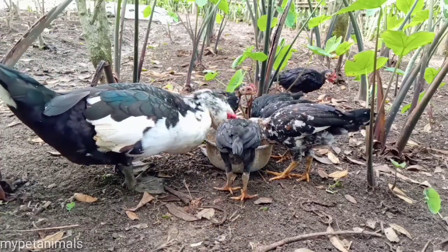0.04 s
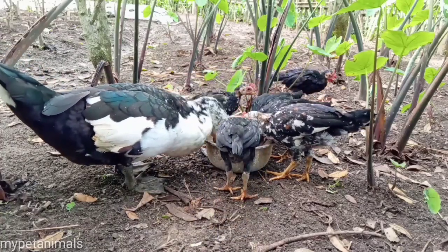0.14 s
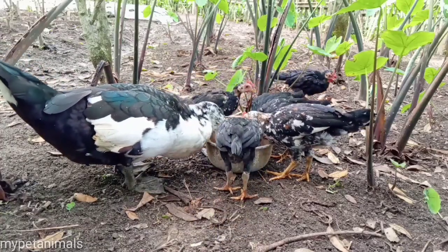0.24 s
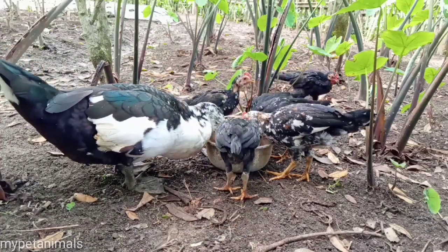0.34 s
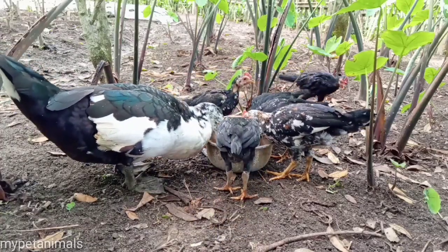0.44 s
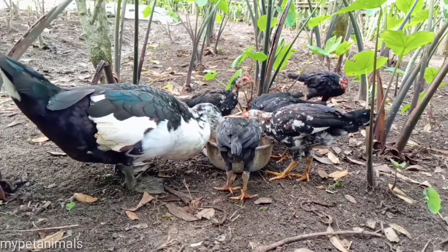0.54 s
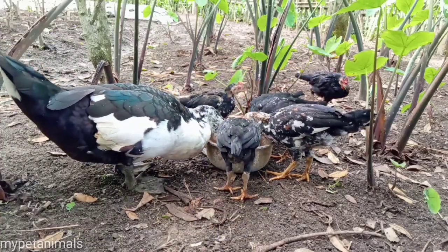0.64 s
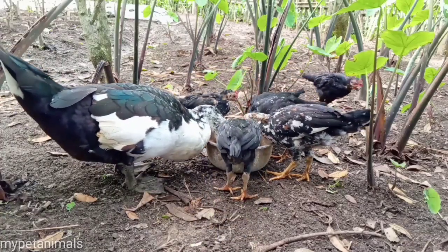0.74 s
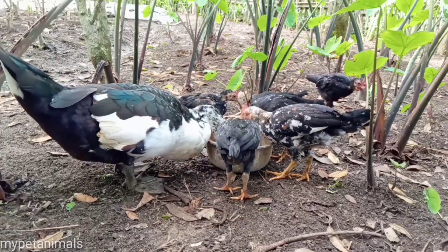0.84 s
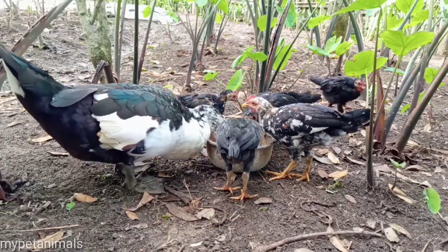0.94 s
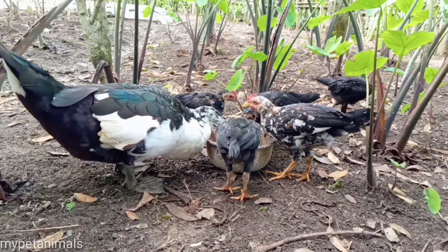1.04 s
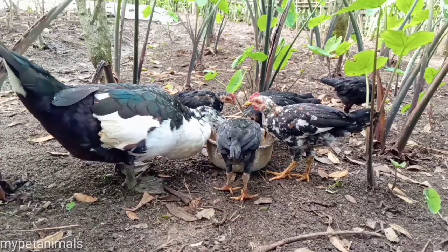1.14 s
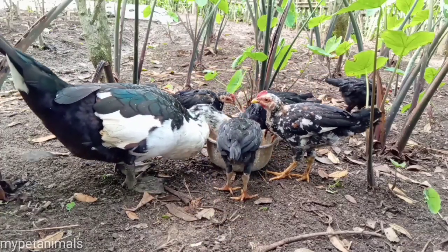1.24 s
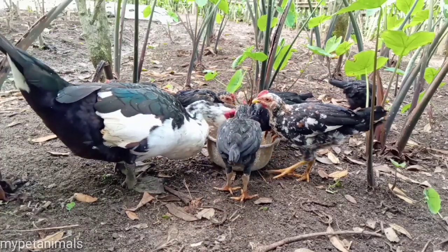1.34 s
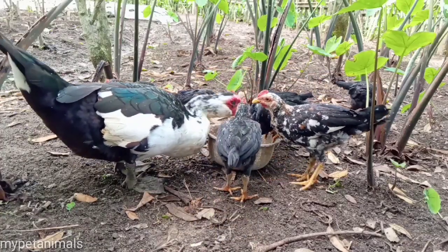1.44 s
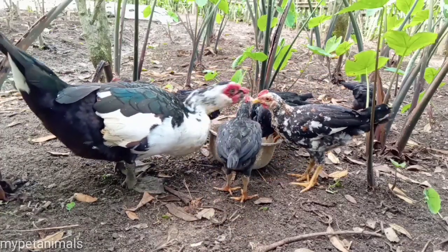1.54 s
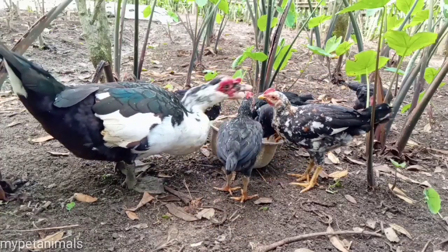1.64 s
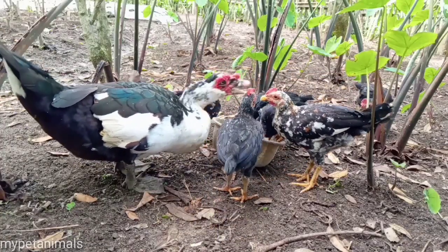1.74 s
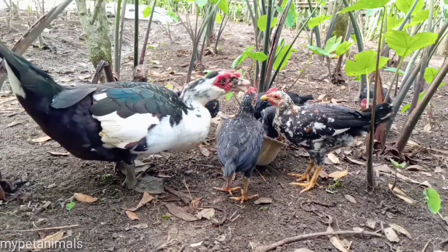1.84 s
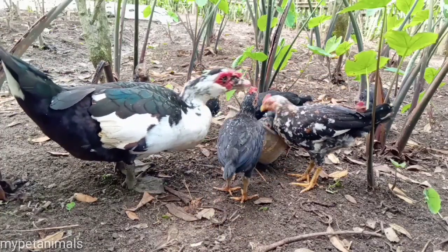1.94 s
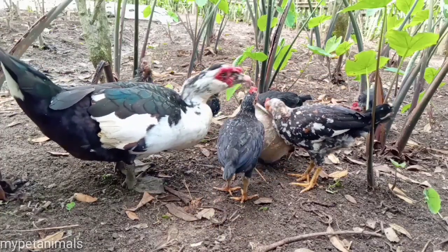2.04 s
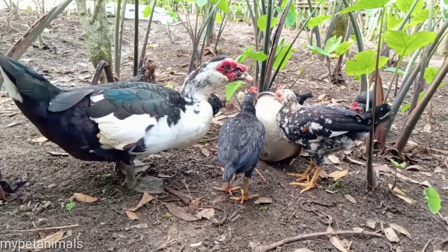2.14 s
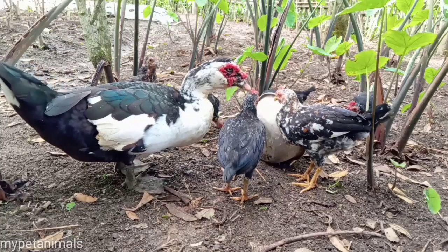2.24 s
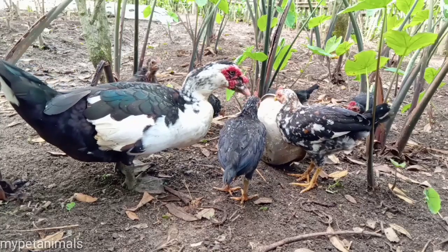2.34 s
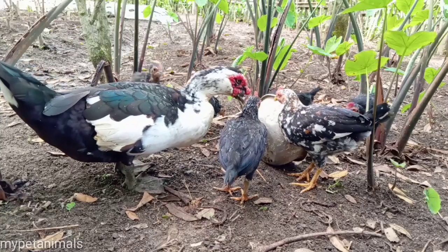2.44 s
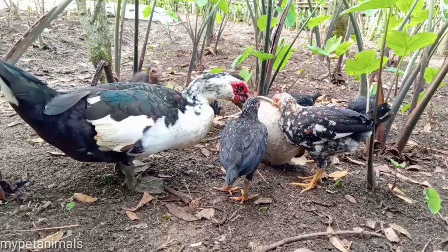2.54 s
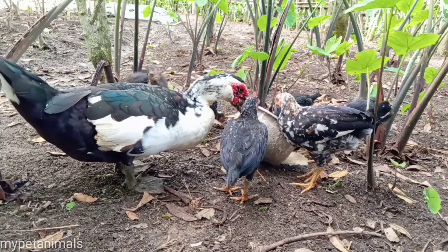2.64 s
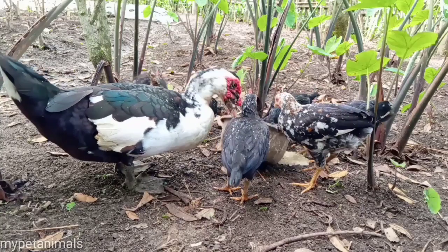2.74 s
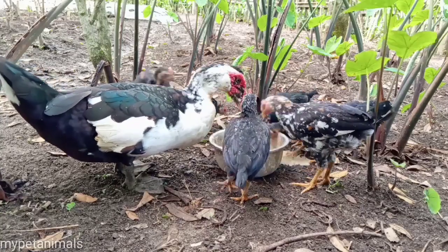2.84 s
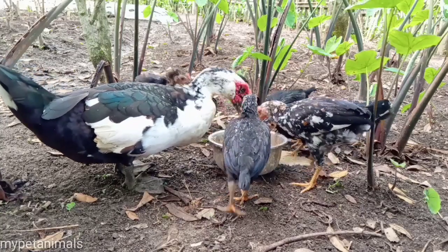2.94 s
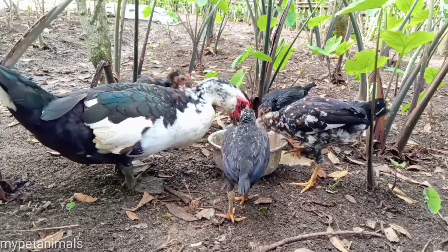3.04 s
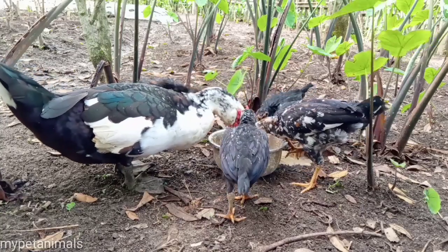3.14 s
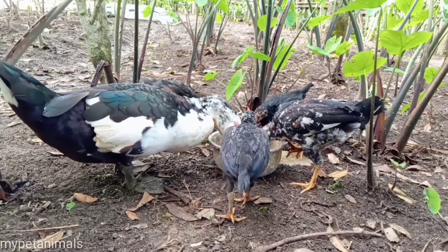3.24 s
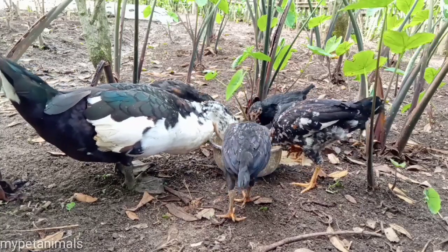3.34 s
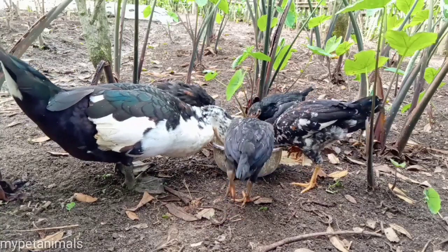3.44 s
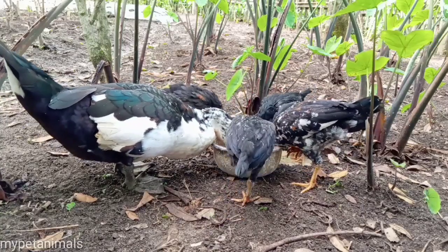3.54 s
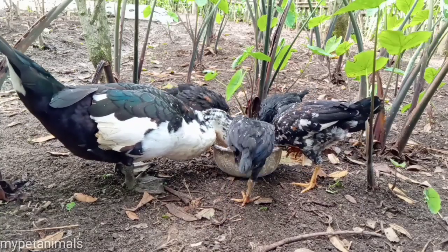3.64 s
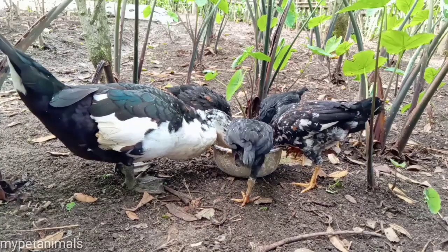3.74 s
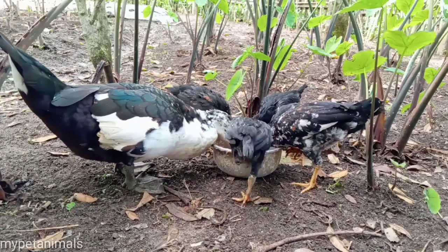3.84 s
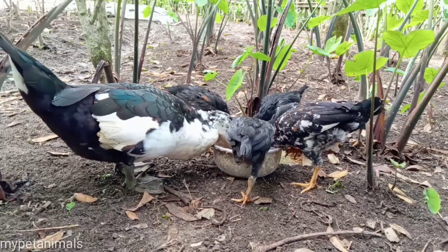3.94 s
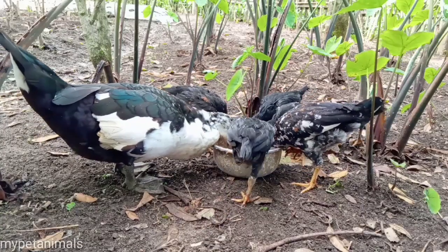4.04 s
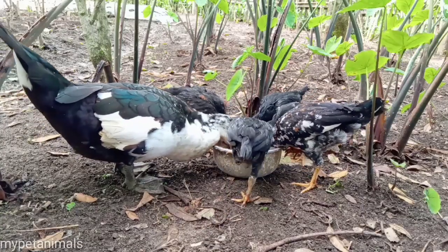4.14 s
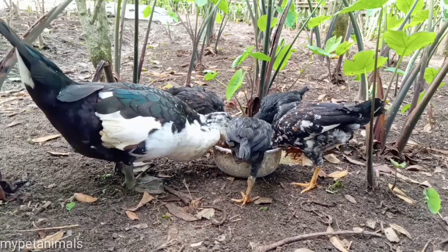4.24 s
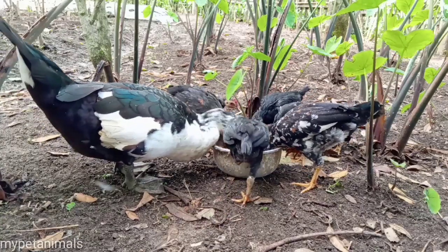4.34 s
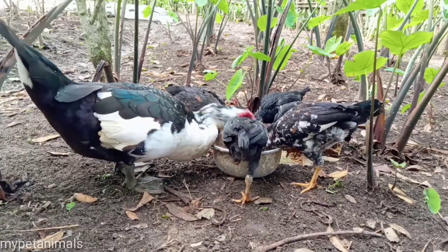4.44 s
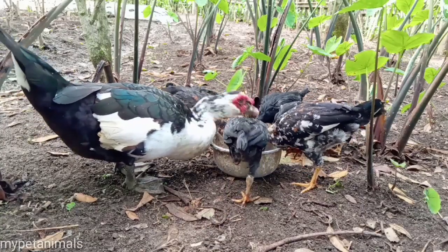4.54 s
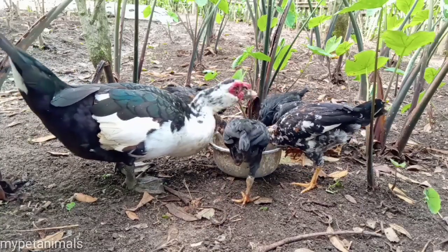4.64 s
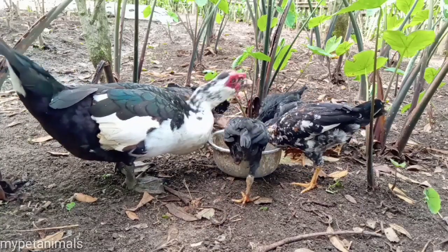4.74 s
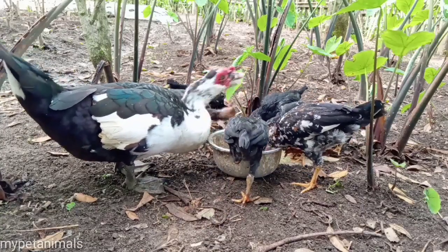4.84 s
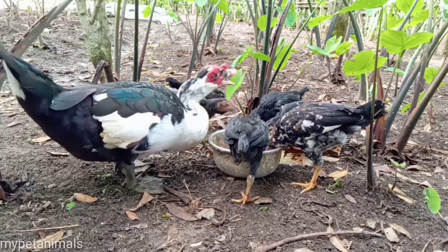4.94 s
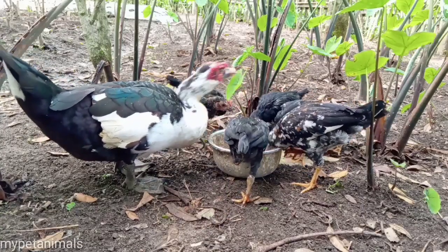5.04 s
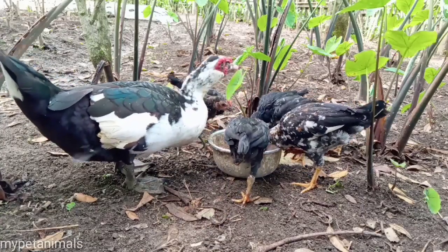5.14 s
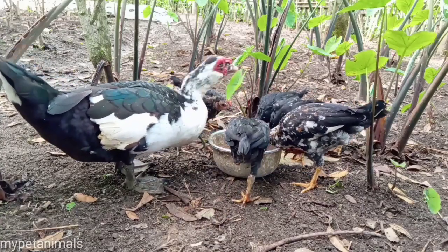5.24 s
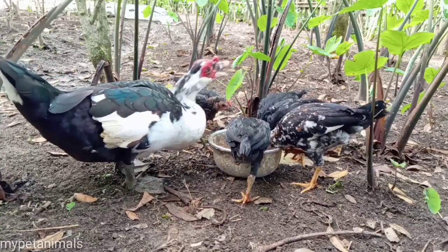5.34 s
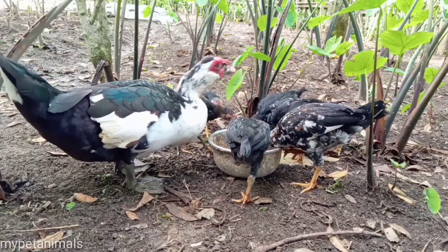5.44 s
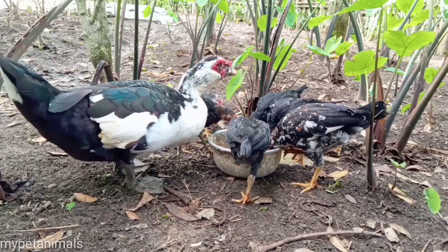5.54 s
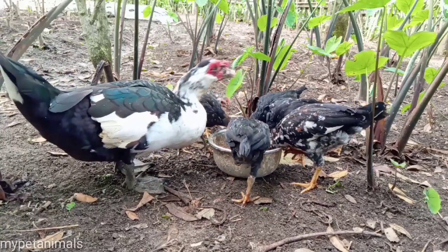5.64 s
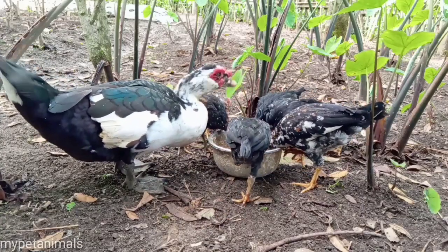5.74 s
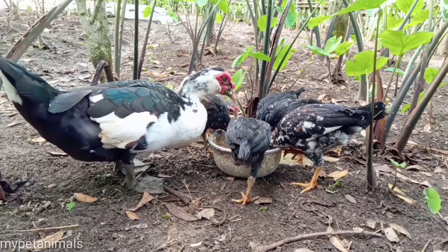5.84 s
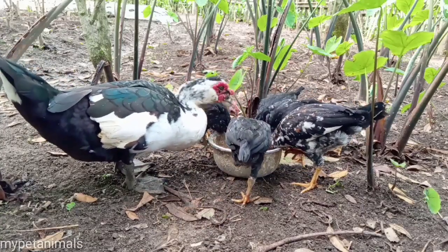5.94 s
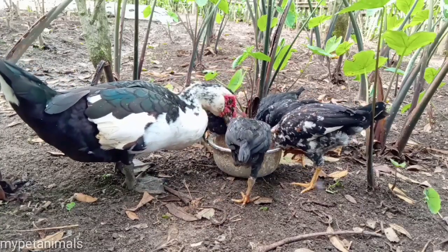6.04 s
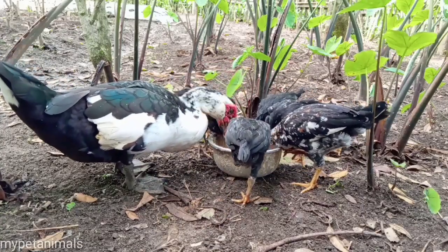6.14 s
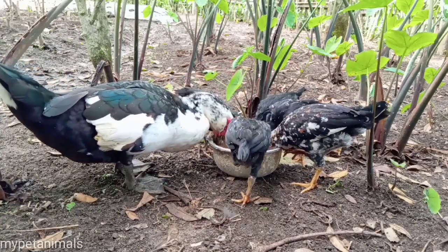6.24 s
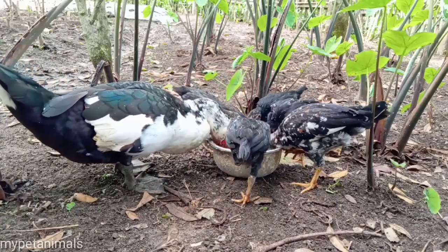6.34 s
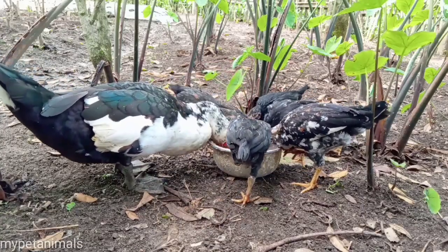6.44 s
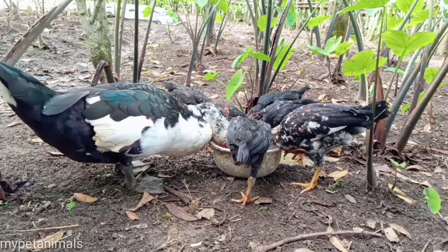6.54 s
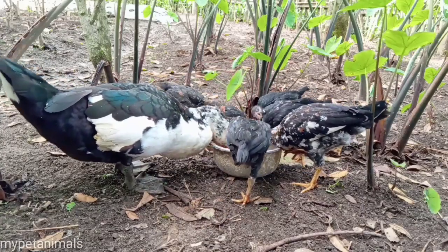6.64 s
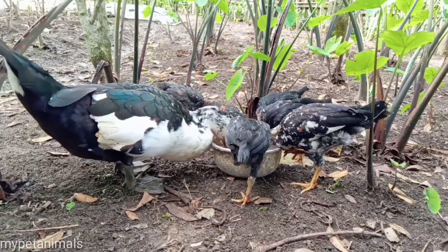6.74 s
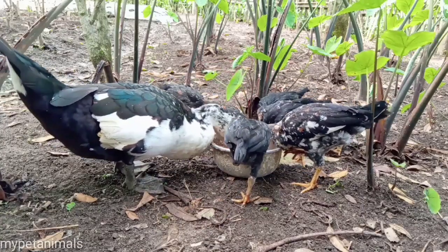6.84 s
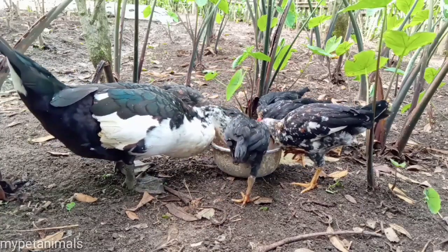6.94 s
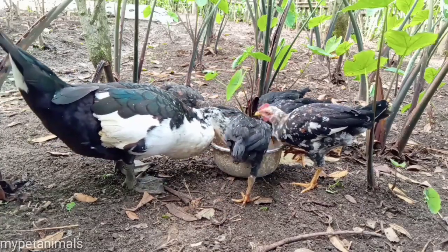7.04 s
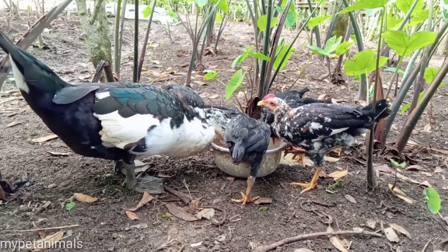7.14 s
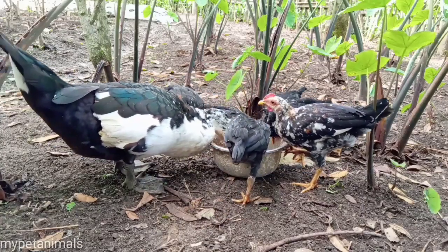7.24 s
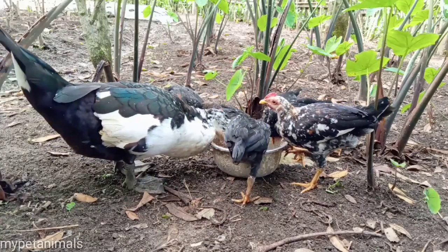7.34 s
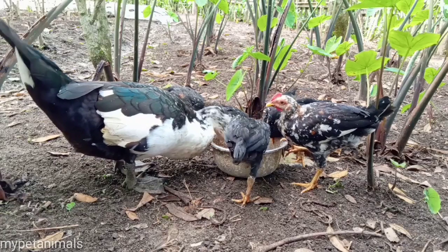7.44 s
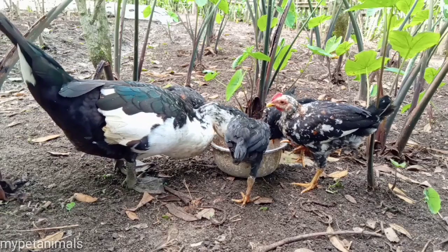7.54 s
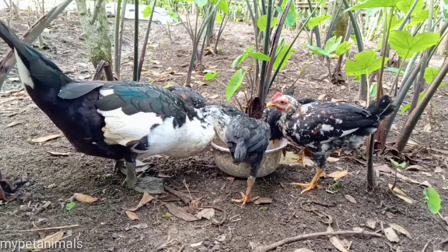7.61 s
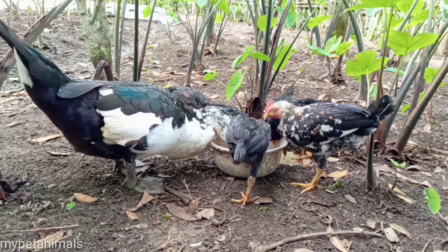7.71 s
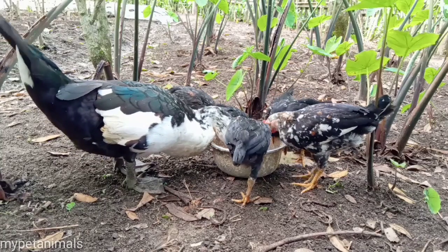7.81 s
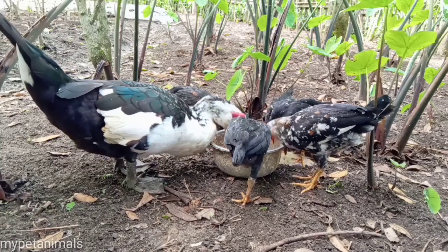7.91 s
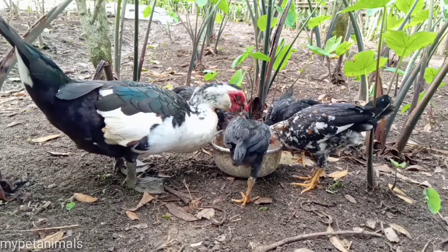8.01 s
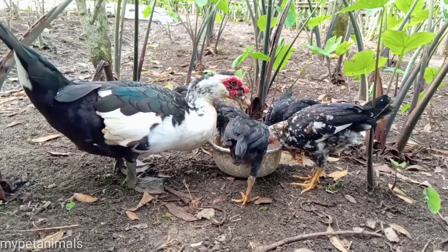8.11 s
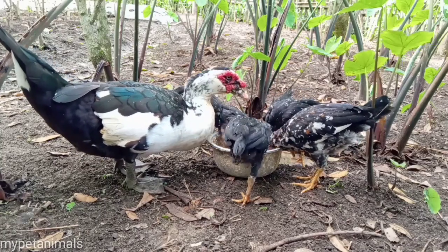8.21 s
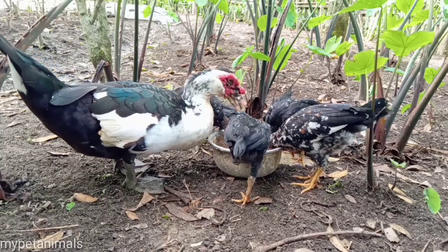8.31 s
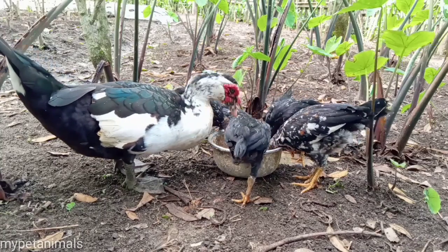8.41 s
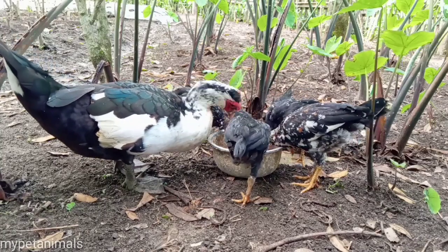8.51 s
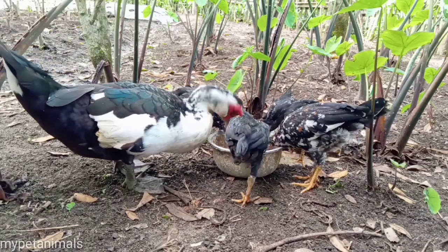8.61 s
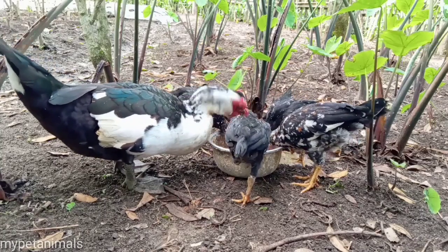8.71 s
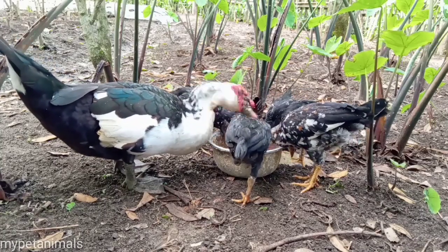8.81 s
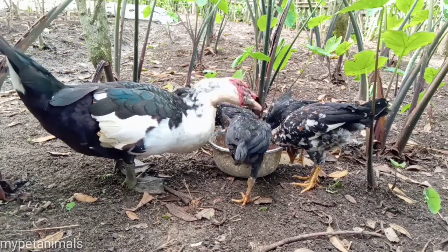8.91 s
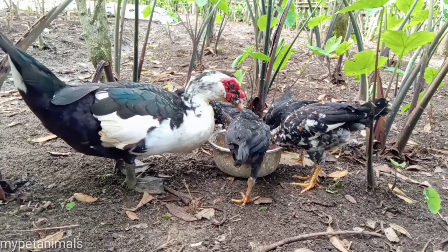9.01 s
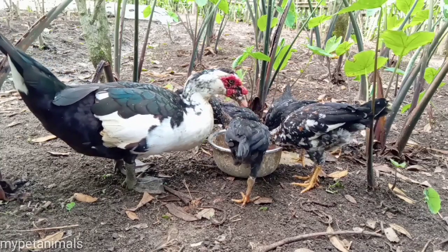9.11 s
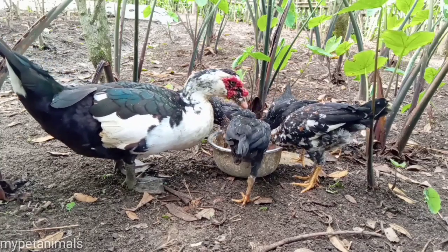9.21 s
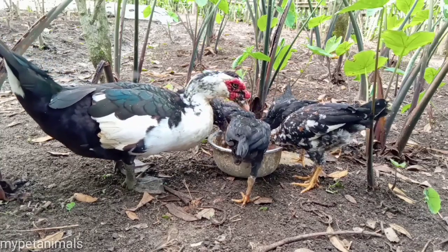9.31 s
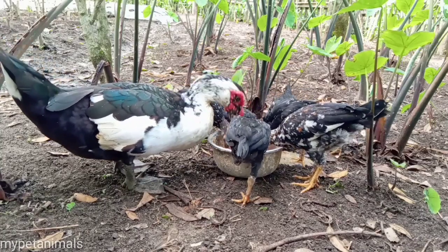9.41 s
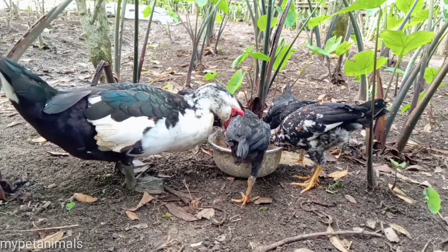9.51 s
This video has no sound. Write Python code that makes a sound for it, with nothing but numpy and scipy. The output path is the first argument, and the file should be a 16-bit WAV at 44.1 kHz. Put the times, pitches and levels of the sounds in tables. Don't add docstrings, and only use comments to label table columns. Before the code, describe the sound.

A quiet open-air yard: soft hiss, thin insect buzz, tiny grain clicks and an unsteady, deep distant engine hum. At 0.1 s a near chick gives a falling chirp with a low murmur, and at 0.2 s a beak cracks brightly on metal. Distant peeps and light ticks follow, with a steep falling whistle at 0.9 s and a held note at 1.9 s. From 2.7 to 3.2 s comes the busiest, loudest burst: a dull bowl knock, overlapping piercing peeps, then a hard ringing rim strike at 3.0 s and paired falling calls. It calms abruptly; faint pecks, leaf brushes and a longer call near 4.1 s, then distant diving peeps around 5 and 6 s. Small clucks and peeps return at 7.3-7.6 s, a short hissing sneeze at 7.85 s, whistles at 8.1 s, and a loud falling call at 8.6 s. Light ticks fade into quiet hum by 9.5 s.

```python
import sys
import numpy as np
from scipy import signal
from scipy.fft import rfft, irfft, next_fast_len
from scipy.io import wavfile
from scipy.ndimage import uniform_filter1d

SR = 44100
rng = np.random.default_rng(int(sys.argv[2]) if len(sys.argv) > 2 else 0)


def wav_record(signal):
    frames = np.transpose(np.atleast_2d(signal))
    bounded = np.clip(frames, -1, 1)
    quanta = np.round(bounded * 32767).astype(np.int16)
    wavfile.write(sys.argv[1], SR, quanta)


def volts(x):
    e = np.asarray(x, float) / 20
    return 10 ** e


N = 422037


def track(rows):
    s, *columns = np.transpose(rows)
    return [np.interp(np.arange(N) / SR, s, c) for c in columns]


def unit(x):
    return x / np.sqrt(np.mean(x ** 2))


def add(out, s, x):
    i = max(int(s * SR), 0)
    out[i:i + len(x)] += x[:N - i]


def colour(x, points):
    hz, db = np.transpose(points)
    size = next_fast_len(len(x))
    f = np.arange(size // 2 + 1) * SR / size + 1
    gain_db = np.interp(np.log(f), np.log(hz), db)
    return irfft(rfft(x, size) * volts(gain_db), size)[:len(x)]


def band(x, hz, width):
    return signal.lfilter(*signal.iirpeak(min(hz, .4 * SR), hz / width, fs=SR), x)


def steep(x, hz, width):
    return unit(band(band(x, hz, width), hz, width))


def noise(size=N):
    return rng.standard_normal(size)


def walk(rate, size=N):
    k = int(SR / rate)
    held = np.repeat(noise(size // k + 1), k)
    return 1.3 * uniform_filter1d(uniform_filter1d(held, k), k)[:size]


# (time [s], level [dB])
YARD_LEVEL = [(0, -46), (.5, -50), (2.4, -49.5), (3.0, -47), (3.27, -56.5), (4.0, -56), (4.8, -53.5),
              (5.5, -52.5), (9.2, -49.5), (9.57, -49.5)]


def yard_level():
    return track(YARD_LEVEL)[0]


# (pitch [Hz], level per Hz [dB])
AIR_COLOUR = [(25, -31.5), (76, -0.5), (120, -2), (430, -14), (2160, -19.5), (3250, -16.5), (4500, -22),
              (7000, -20.5), (8500, -21.5), (9600, -27.5), (12200, -29), (14500, -25.5), (15600, -28.5)]


def still_air(calm_db):
    air = colour(noise(), AIR_COLOUR)
    centres = 40 * 2 ** np.arange(0, 9, .5)
    air = unit(sum(band(air, hz, hz / 0.97) * volts(1.5 * walk(7.4)) for hz in centres))
    return volts(calm_db + 2.5) * air


def insects(calm_db):
    buzz = volts(-62.5) * steep(noise(), 6100., 450.0) * volts(2.0 * walk(40))
    return buzz * volts(0.75 * (calm_db + 56))


def rolling_grain():
    hits = (rng.random(N) < 15 / SR) * volts(np.minimum(3.0 * rng.exponential(size=N), 9))
    puffs = signal.lfilter([1], [1, -.96], hits)
    return volts(-55.5) * puffs * steep(noise(), 11000., 8000.)


# (time [s], hum pitch [Hz], hum level [dB], whine level [dB])
ENGINE = [(0, 78, -51.5, -51), (1.0, 78, -46.5, -52), (1.4, 82, -62, -52), (2.0, 76, -47.5, -57.5),
          (3.3, 75, -53, -66), (3.97, 74, -53, -66), (4.1, 97, -51, -62), (5.19, 89, -60.5, -64),
          (5.49, 73, -50.5, -72.5), (6.5, 73, -53, -76), (7.1, 73, -48.5, -78), (8.1, 73, -52, -80),
          (9.3, 73, -48, -80), (9.45, 56, -45, -80), (9.57, 60, -48, -80)]
# (pitch [Hz], level [dB], start time [s])
ENGINE_TONES = [
    (318, -68, 5.3),
    (425, -68, 5.3),
    (650, -67, 7.9),
    (212, -62, 9.1),
]


def far_engine(gain):
    hum_hz, hum_db, whine_db = track(ENGINE)
    t = np.arange(N) / SR
    hum_level = volts(hum_db + 2.7 * walk(12))
    hum = hum_level * np.sin(2 * np.pi * np.cumsum(hum_hz * (1 + 0.02865 * walk(10))) / SR)
    sound = volts(whine_db) * unit(band(noise(), 285.8, 4.8))
    for hz, db, s in ENGINE_TONES:
        sound += volts(db) * steep(noise(), 1. * hz, 7.) * np.clip((t - s) / .15, 0, 1)
    return hum / gain ** 0.27 + sound


def contour(u, top_hz, end_hz, db, bend, attack, faint_db, release, fade_db, flick=0, depth=0):
    rise = np.clip(1 - u / (flick + 1e-6), 0, 1)
    fall = np.clip((u - flick) / (1 - flick), 0, 1) ** bend
    pitch = top_hz * (1 - depth * rise ** 2) + (end_hz - top_hz) * fall
    swell_db = faint_db * np.clip(1 - u / attack, 0, 1)
    return pitch, db + swell_db + fade_db * np.clip(1 - (1 - u) / release, 0, 1)


# (pitch [Hz], level [dB])
THROAT = [
    (3000, -0.5),
    (4000, -13),
    (4700, 6),
    (5500, -11),
    (7100, 2),
    (8800, -9),
    (10500, -2.5),
    (12500, -18),
    (14500, -3),
]


def sing(rows, tremble, pressed_db, fall_db, flutter_db, swell=0.35, patchy_db=2.5, small=1.0,
         wobble=.006, edge_s=.005, **shape):
    out, own = np.zeros(N), rng.integers(N)
    for s, length, top_hz, end_hz, db in rows:
        t = np.arange(-edge_s, length + edge_s, 1 / SR)
        now = (own + int(s * SR) + np.arange(len(t))) % N
        shake = tremble[:, now]
        glide, effort_db = contour(np.clip(t / length, 0, 1), top_hz, end_hz, db, **shape)
        pitch = uniform_filter1d(glide, size=150) * (1 + wobble * shake[1])
        loud_db = uniform_filter1d(effort_db, size=150) + flutter_db * shake[0]
        phase = 2 * np.pi * np.cumsum(pitch) / SR
        tone = np.sin(phase)
        for k in range(2, 5):
            over_db = pressed_db + fall_db * (k - 2) + swell * (loud_db - db)
            over_db += np.interp(k * pitch / small, *np.transpose(THROAT))
            over_db += patchy_db * tremble[2, (now + k * own) % N]
            audible = k * pitch < SR / 2.5
            tone = tone + volts(over_db) * np.sin(k * phase) * audible
        edges = np.clip(np.minimum(t - t[0], t[-1] - t) / (2 * edge_s), 0, 1) ** 2
        add(out, s - edge_s, tone * volts(loud_db) * edges)
    return out


def near_chick(rows, tremble, **kind):
    return sing(rows, tremble, fall_db=-6.5, flutter_db=1.2, **kind)


def far_bird(rows, tremble, **kind):
    return sing(rows, tremble, fall_db=-10, flutter_db=2.2, **kind)


# (start [s], length [s], first pitch [Hz], last pitch [Hz],
# peak level [dB])
FAR_NOTES = [(0.58, .04, 2900, 2830, -36), (0.568, .012, 2200, 2850, -45), (0.052, .008, 2400, 2700, -38),
             (1.872, .025, 2200, 2900, -41), (1.637, .01, 2250, 3100, -43), (1.905, .02, 4450, 4420, -43),
             (1.895, .05, 2100, 2350, -44), (9.24, .2, 1575, 1530, -58), (6.46, .07, 3350, 3300, -54),
             (6.43, .035, 3200, 3400, -44), (6.415, .04, 2750, 3050, -46), (6.59, .05, 2450, 2500, -52),
             (6.5, .035, 1980, 2020, -56),
             (0.806, .024, 2970, 2930, -33), (0.615, .028, 3050, 2550, -36),
               (1.003, .012, 4750, 4450, -44), (1.016, .017, 4150, 3600, -38),
               (1.025, .02, 3350, 2950, -42), (2.545, .035, 3500, 3180, -37),
               (2.695, .055, 2870, 2850, -31), (3.385, .04, 2970, 2900, -47), (3.54, .055, 2650, 3520, -46),
               (3.595, .025, 3520, 3530, -48), (3.715, .08, 2400, 2800, -51), (6.39, .042, 2400, 3450, -39),
               (6.365, .015, 1950, 1950, -48), (6.53, .025, 2600, 2840, -46),
               (6.557, .034, 2440, 2480, -42), (6.592, .058, 2620, 2750, -43),
               (6.65, .045, 2700, 2640, -54), (7.275, .025, 4040, 3650, -47), (1.89, .045, 1475, 1470, -40),
               (1.893, .017, 3700, 3680, -40), (2.81, .014, 3000, 4500, -33),
               (2.823, .021, 4640, 4500, -37), (2.845, .025, 3850, 3100, -30),
               (2.841, .006, 4400, 2100, -32), (2.905, .015, 4200, 4400, -30),
               (4.057, .007, 4450, 4700, -48), (4.068, .02, 5150, 5150, -51),
               (4.043, .022, 4200, 4050, -54), (4.096, .028, 3160, 2980, -33),
               (4.122, .024, 2980, 1950, -35), (6.322, .01, 3800, 3200, -52),
               (7.397, .022, 2750, 2950, -44), (8.012, .038, 2950, 2950, -49), (8.05, .03, 2800, 2050, -46)]


def far_notes(tremble):
    return far_bird(FAR_NOTES, tremble, bend=1.01, attack=.3, faint_db=-6,
                    release=.3, fade_db=-4, pressed_db=-26)


# (start [s], length [s], top pitch [Hz], end pitch [Hz], peak level [dB])
FALLS = [
    (0.068, .074, 4280, 3180, -21),
    (8.589, .051, 3660, 2880, -5),
    (3.148, .072, 4080, 3060, -17),
    (3.118, .054, 3850, 3000, -17),
]


def falls(tremble):
    return near_chick(FALLS, tremble, bend=.95, attack=.3, faint_db=-11,
                      release=.15, fade_db=-6, pressed_db=-15)


# (start [s], length [s], first pitch [Hz], last pitch [Hz], peak level [dB])
CLUCKS = [
    (0.097, .045, 414, 405, -31),
    (3.1, .022, 430, 430, -35),
    (2.16, .02, 1120, 1080, -37),
    (9.24, .21, 795, 765, -56),
    (2.777, .016, 1495, 1480, -39),
    (7.38, .018, 1130, 900, -20),
    (7.59, .014, 1100, 1080, -36),
    (8.62, .05, 1290, 1240, -43),
    (1.942, .03, 760, 740, -41),
]


def clucks(tremble):
    return sing(CLUCKS, tremble, fall_db=-3, flutter_db=1.5, patchy_db=1.0, bend=.8, attack=.3,
                faint_db=-7, release=.4, fade_db=-9, pressed_db=-7)


# (time [s], peak level [dB], ring pitch [Hz])
TICKS = [(0.1851, 2.5, 7570), (0.1896, -9, 8100), (0.2583, -21, 7420), (0.5901, -33, 7750),
         (0.6204, -31, 7990), (0.6878, -19, 9500), (0.823, -28, 7140), (0.9012, -31, 8400),
         (0.9801, -15, 7300), (1.0605, -33, 7400), (1.1648, -40, 12400), (1.6691, -29.5, 10000),
         (1.8642, -34, 7600), (2.0444, -39, 7540), (2.3366, -27, 7200), (2.8729, -23.5, 7210),
         (3.028, 4.5, 7420), (3.0336, 1, 7470), (4.1744, -24.5, 7330), (4.1909, -27, 8010),
         (4.2732, -35, 7770), (4.7187, -39, 14500), (5.223, -35.5, 8380), (5.4999, -35, 8300),
         (7.5258, -29.5, 7070), (8.1309, -43, 6830), (8.8104, -31.5, 14800), (8.8238, -36, 7830),
         (8.8847, -35.5, 7660), (8.916, -38, 7330),
         (0.0974, -33, 7260), (0.4189, -43, 7760), (0.7537, -39, 9110), (1.3982, -39, 8340),
          (1.7559, -37, 8000), (1.9195, -34, 8780), (2.1244, -37, 7170), (2.152, -30, 7710),
          (2.5401, -34, 7460), (2.7174, -32, 7110), (4.2482, -37, 7650), (4.3061, -35, 7420),
          (4.6329, -50, 6940), (4.7381, -39, 7930), (4.7706, -48, 7200), (4.8633, -42, 7340),
          (5.0943, -40, 7400), (5.2235, -39, 8390), (5.2994, -45, 7460), (5.3694, -46, 7080),
          (5.4256, -45, 7730), (5.5747, -43, 6650), (5.5942, -43, 8470), (6.0077, -43, 10000),
          (6.4462, -40, 8060), (8.9594, -44, 7330), (8.9794, -48, 7410)]
# (pitch [Hz], width [Hz], level [dB])
RIM = [
    (7450, 30, -0.5),
    (7950, 28, 2),
    (8420, 27, -11),
    (9020, 30, -13),
]


def ticks():
    out, t = np.zeros(N), np.arange(4800) / SR
    thin = signal.butter(4, 6200, "high", fs=SR, output="sos")
    for s, db, hz in TICKS:
        grit = noise(len(t))
        ring = steep(grit, hz, .25 * hz) * (volts(-60 * t / 0.022) + volts(-22 - 60 * t / 0.075))
        metal = unit(sum(volts(g_db) * band(grit, f, 7.0 * w) for f, w, g_db in RIM))
        metal = volts(-17.5 + 0.34 * db) * metal * volts(-60 * t / 0.13)
        crack = volts(-15.5 - .3 * db) * steep(grit, 9500., 12000.) * volts(-60 * t / .006)
        bright = signal.sosfilt(thin, ring)
        add(out, s, volts(db - 6) * (bright + crack + metal))
    return out


# (start [s], length [s], top pitch [Hz], end pitch [Hz], peak level [dB])
PEEPS = [
    (0.902, .017, 4800, 3950, -27),
    (2.94, .021, 3370, 3000, -2.5),
    (0.105, .04, 3400, 2350, -23),
    (3.088, .032, 4600, 4050, -31),
    (4.313, .043, 3650, 2450, -20),
    (7.546, .024, 3560, 3300, -15),
    (2.141, .017, 3050, 2450, -17),
    (8.565, .022, 2950, 3900, -22),
    (7.336, .014, 3000, 2780, -23),
]


def peeps(tremble):
    return near_chick(PEEPS, tremble, bend=1.05, attack=.75, faint_db=-14,
                      release=.15, fade_db=-5, pressed_db=-14)


# (start [s], length [s], top pitch [Hz], end pitch [Hz], peak level [dB])
YELPS = [(2.128, .015, 3420, 3150, -25), (5.148, .03, 3500, 2800, -25), (8.098, .016, 3050, 2050, -17),
         (2.903, .016, 2950, 2500, -14), (7.536, .005, 3300, 3600, -30), (0.183, .022, 3120, 3950, -26),
         (4.3, .014, 2800, 3600, -27), (8.583, .009, 4300, 3800, -18), (0.14, .047, 3170, 3080, -28),
         (7.578, .022, 2400, 2160, -18), (7.57, .009, 3250, 2400, -19), (2.159, .014, 2450, 2230, -28),
         (7.349, .019, 2560, 2130, -23), (2.914, .028, 3800, 3370, -6.5)]


def yelps(tremble):
    return near_chick(YELPS, tremble, bend=.9, attack=.1, faint_db=-3,
                      release=.6, fade_db=-7, pressed_db=-15)


# (time [s], peak level [dB], pitch [Hz], time to die by 60 dB [s])
KNOCKS = [(0.1788, -14, 334, 0.035), (0.484, -31.5, 680, 0.025), (1.589, -34, 320, 0.046),
          (2.0225, -23, 690, 0.043), (2.642, -27.5, 538, 0.052), (2.732, -11, 480, 0.045),
          (3.61, -41, 1490, 0.042), (3.798, -36, 824, 0.044), (3.807, -32.5, 2400, 0.036),
          (3.884, -41, 980, 0.045), (3.9555, -30.5, 805, 0.036), (4.173, -35, 553, 0.043),
          (5.121, -38, 1400, 0.04), (5.227, -31, 751, 0.037), (5.662, -34, 1240, 0.033),
          (6.016, -32, 435, 0.052), (6.646, -31, 440, 0.036), (7.022, -36, 597, 0.043),
          (8.679, -29, 400, 0.04), (8.8237, -25, 1600, 0.021), (8.844, -31, 2170, 0.018)]


def knocks():
    out, t = np.zeros(N), np.arange(5000) / SR
    for s, db, hz, t60 in KNOCKS:
        grit = noise(len(t))
        thud = 0.58 * np.sin(2 * np.pi * hz * t)
        thud += 0.35 * steep(grit, hz, 14 / t60)
        thud += 0.33 * steep(grit, 0.66 * hz, 14 / t60) * volts(-60 * t / .07)
        slap = volts(6 + .31 * db) * np.sin(2 * np.pi * 1400 * t) * volts(-60 * t / .006)
        onset = np.minimum(t / .0003, 1)
        add(out, s, volts(db - 2) * (thud * volts(-60 * t / t60) + slap) * onset)
    return out


# (start [s], length [s], top pitch [Hz], end pitch [Hz], peak level [dB])
PIPES = [(0.205, .033, 4000, 3640, -31), (0.24, .04, 3620, 3540, -34), (0.28, .045, 3540, 3480, -44),
         (2.72, .07, 3500, 2550, -28), (2.869, .011, 3720, 3450, 0), (2.881, .025, 3270, 2950, -3),
         (2.803, .028, 2780, 1930, -15), (7.367, .013, 1650, 1300, -25), (7.363, .012, 2450, 2200, -32),
         (7.541, .012, 3650, 3550, -33), (3.219, .022, 2750, 2130, -28), (3.173, .009, 2700, 2580, -23),
         (2.962, .024, 2900, 2500, -11), (2.957, .012, 1550, 1350, -30), (2.882, .009, 1500, 1500, -32),
         (2.925, .014, 3000, 2800, -24), (7.37, .01, 3300, 2900, -38), (8.082, .04, 3240, 3190, -32),
         (8.058, .014, 3660, 3480, -33), (8.033, .015, 4420, 4250, -46), (8.072, .009, 3450, 3300, -43),
         (2.883, .035, 3700, 3250, -18), (2.939, .02, 2750, 2330, -13), (2.875, .013, 1150, 800, -24),
         (1.947, .018, 2700, 2560, -25), (4.087, .036, 4880, 4200, -34), (4.324, .024, 3420, 2800, -18),
         (1.922, .036, 3550, 2650, -20)]


def pipes(tremble):
    return near_chick(PIPES, tremble, bend=.72, attack=.2, faint_db=-5,
                      release=.25, fade_db=-3, pressed_db=-30)


# (start [s], length [s], top pitch [Hz], end pitch [Hz], peak level [dB])
FAR_PEEPS = [(0.575, .065, 3510, 2570, -35), (0.79, .072, 3570, 2750, -34), (1.642, .063, 3420, 2780, -33),
             (3.385, .1, 3580, 2350, -45), (3.595, .06, 2940, 2610, -43), (4.54, .065, 3690, 3150, -46),
             (4.695, .085, 3730, 2890, -45), (4.89, .09, 3780, 2950, -35), (5.095, .05, 3740, 3510, -36),
             (5.985, .09, 3860, 3070, -36), (7.305, .03, 2750, 2600, -39), (1.645, .085, 2810, 2450, -38),
             (2.545, .07, 2900, 2510, -36)]


def far_peeps(tremble):
    return far_bird(FAR_PEEPS, tremble, flick=.2, depth=.12, bend=1.4, attack=.75, faint_db=-11,
                    release=.15, fade_db=-5, pressed_db=-26)


# (start [s], length [s], top pitch [Hz], end pitch [Hz], peak level [dB])
DROPS = [
    (0.917, .06, 3780, 2130, -15.5),
]


def drops(tremble):
    return near_chick(DROPS, tremble, bend=1.5, attack=.25, faint_db=-8,
                      release=.3, fade_db=-13, pressed_db=-15, small=1.11)


# (start [s], length [s], first pitch [Hz], last pitch [Hz], peak level [dB])
HOLDS = [
    (1.888, .044, 2930, 2945, -15),
]


def holds(tremble):
    return near_chick(HOLDS, tremble, bend=1, attack=.6, faint_db=-16,
                      release=.1, fade_db=-2, pressed_db=-30)


# (middle [s], spread [s], level [dB])
BRUSHES = [
    (2.11, 0.051, -46),
    (2.62, 0.12, -49),
    (2.8, 0.098, -46.5),
    (3.66, 0.045, -46.5),
    (4.2, 0.079, -47.5),
    (4.35, .03, -52),
    (5.0, .12, -56),
    (2.93, .05, -48),
    (6.85, 0.19, -51),
]


def brushed_leaves():
    t = np.arange(N) / SR
    brush = sum(volts(db) * np.exp(-.5 * ((t - s) / spread) ** 2) for s, spread, db in BRUSHES)
    rustle = noise() * volts(2.0 * walk(150))
    leaf_colour = [(600, -16), (3000, -4.5), (5000, -8.5), (7500, -1), (10000, -12.5), (15000, -9.5)]
    return brush * unit(colour(rustle, leaf_colour))


# (start [s], length [s], top pitch [Hz], end pitch [Hz], peak level [dB])
SAGS = [
    (2.765, .045, 3000, 2650, -17),
]


def sags(tremble):
    return near_chick(SAGS, tremble, flick=.18, depth=.04, bend=2.1, attack=.65, faint_db=-8,
                      release=.15, fade_db=-3, pressed_db=-17, small=1.25)


# (start [s], length [s], top pitch [Hz], end pitch [Hz], peak level [dB])
FAR_DIVES = [
    (4.043, .05, 4300, 3300, -55),
    (5.11, .04, 5800, 3550, -33),
    (4.585, .03, 4600, 3100, -50),
    (4.718, .04, 5200, 3500, -47),
    (4.922, .036, 4850, 3200, -39),
    (6.0, .075, 5560, 3150, -35),
]


def far_dives(tremble):
    return far_bird(FAR_DIVES, tremble, bend=1.05, attack=.7, faint_db=-9,
                    release=.15, fade_db=-3, pressed_db=-13)


# (start [s], length [s], top pitch [Hz], end pitch [Hz], peak level [dB])
LONGS = [
    (4.112, .093, 4230, 3860, -33),
    (4.118, .08, 4320, 4000, -35),
    (4.207, .045, 3880, 3680, -36),
    (4.215, .036, 3900, 3800, -40),
]


def longs(tremble):
    return near_chick(LONGS, tremble, bend=.35, attack=.3, faint_db=-8,
                      release=.2, fade_db=-5, pressed_db=-22, wobble=.004)


# (time [s], hiss level [dB], nostril tone over hiss [dB])
SNEEZE = [
    (7.795, -63, 20),
    (7.812, -40.5, 1),
    (7.835, -25, -12),
    (7.852, -23.5, 0),
    (7.868, -27.5, 0.5),
    (7.885, -47, -17),
    (7.91, -51, -8),
]
# (pitch [Hz], level per Hz [dB])
NOSE = [(1000, -13), (1500, -2.5), (2100, -11.5), (3000, -0.5), (5200, -5.5), (6900, 1.5), (9000, -12.5),
        (10200, -7), (12000, -19), (14000, -6), (15500, -20)]


def sneeze():
    hiss_db, tone_db = track(SNEEZE)
    t = np.arange(N) / SR
    during = (t > SNEEZE[0][0]) & (t < SNEEZE[-1][0])
    on = uniform_filter1d(1. * during, size=300)
    thin = signal.butter(2, 1300, "high", fs=SR, output="sos")
    hiss = unit(colour(signal.sosfilt(thin, noise()), NOSE))
    tone = unit(band(noise(), 740.0, 190.0))
    return on * volts(hiss_db) * (hiss * volts(4.2 * walk(200)) + volts(tone_db) * tone)


def automatic_level(near, knee_db, slope, window_s, slew_s):
    window = int(window_s * SR)
    power = uniform_filter1d(near ** 2, window, origin=int(0.27 * window))
    over_db = np.maximum(10 * np.log10(np.abs(power) + 1e-9) - knee_db, 0)
    return volts(uniform_filter1d(slope * over_db, int(slew_s * SR)))


def echo(sound):
    t = np.arange(12000) / SR
    tail = noise(len(t)) * (volts(-60 * t / 0.12) + volts(-17 - 60 * t / .4)) * (t > .004)
    tail = colour(tail, [(8000, 0), (12000, -8)])
    return volts(-37) * signal.fftconvolve(sound, tail)[:N]


def scene():
    tremble = np.array([walk(155.2), walk(300), walk(90)])
    near_calls = [falls, peeps, yelps, pipes, drops, holds, sags, longs]
    chicks = sum(call(tremble) for call in near_calls)
    add(chicks, .0031, -.35 * chicks)
    far = sum(call(tremble) for call in [far_notes, far_peeps, far_dives])
    near = chicks + far + clucks(tremble) + ticks() + knocks() + sneeze()
    gain = automatic_level(near, knee_db=-48, slope=0.38, window_s=0.047, slew_s=.01)
    wet = echo((near + 1.1 * far) / gain)
    calm_db = yard_level()
    yard = still_air(calm_db) + insects(calm_db) + rolling_grain() + far_engine(gain) + brushed_leaves()
    return (near + gain * (wet + yard))[None]


def band_limit(x):
    return signal.sosfilt(signal.butter(12, 16470, fs=SR, output="sos"), x)


def record(dry):
    top = signal.ellip(10, .3, 60, 15750, fs=SR, output="sos")
    mix = signal.sosfilt(top, np.clip(dry, -.93, .93))
    return band_limit(mix)


dry = scene()
out = record(dry)
wav_record(out)
```